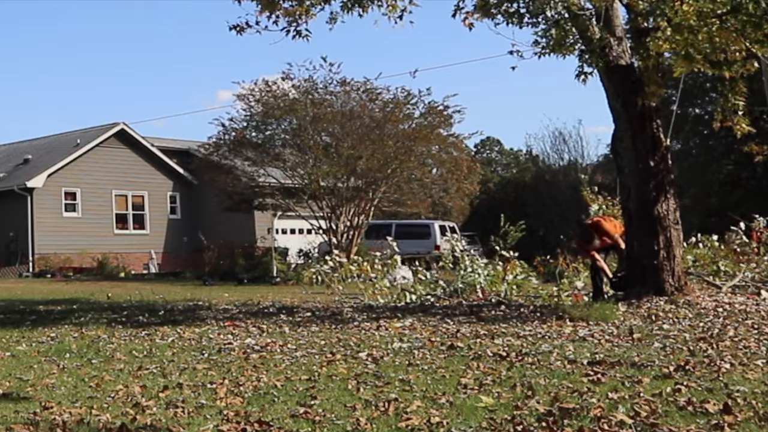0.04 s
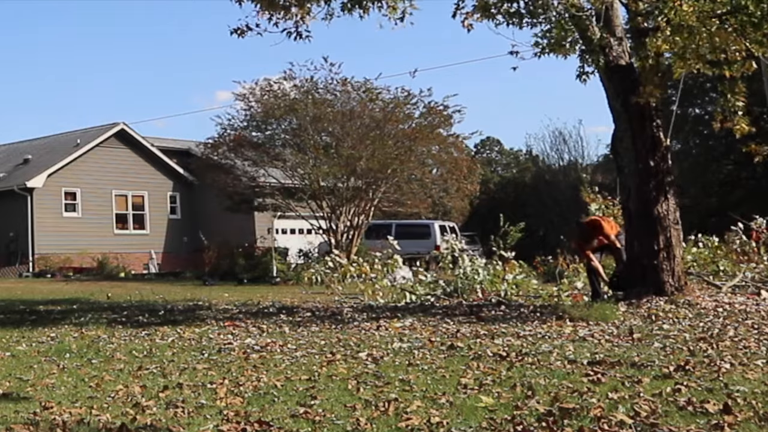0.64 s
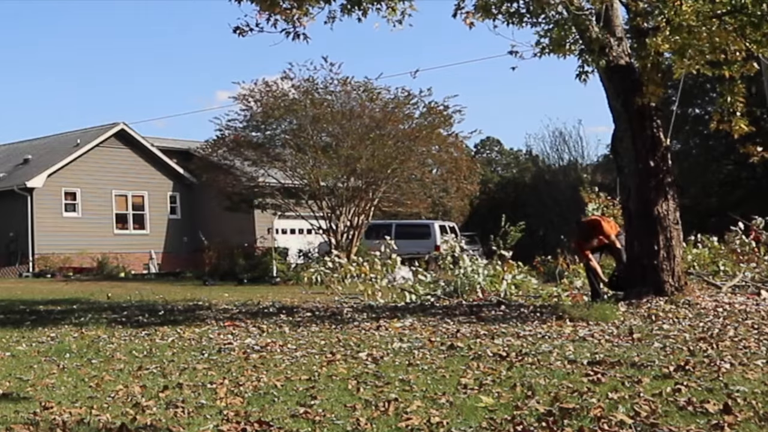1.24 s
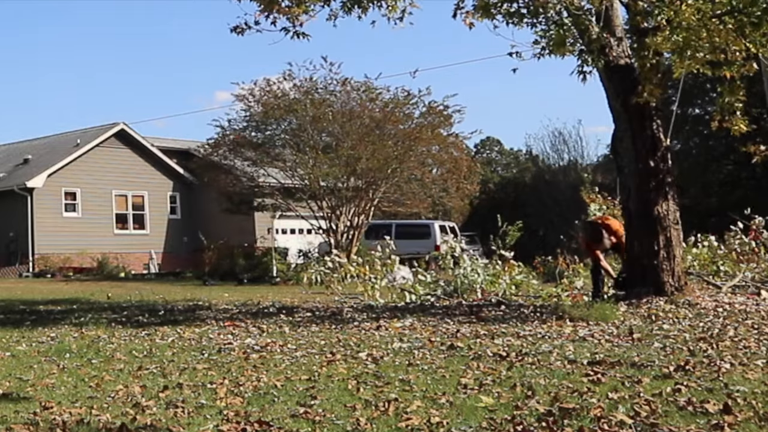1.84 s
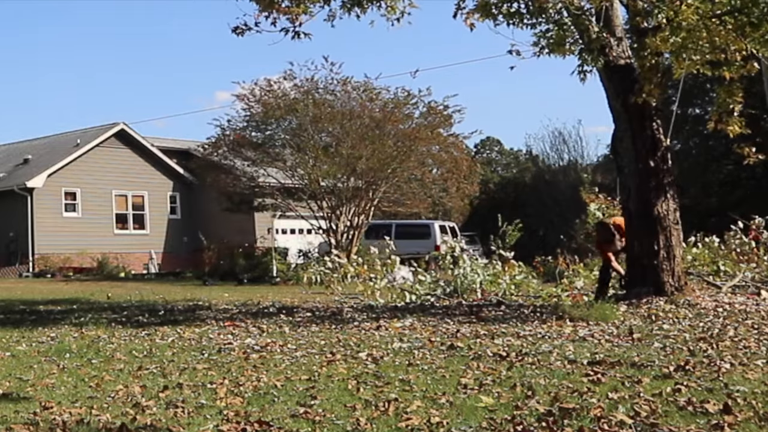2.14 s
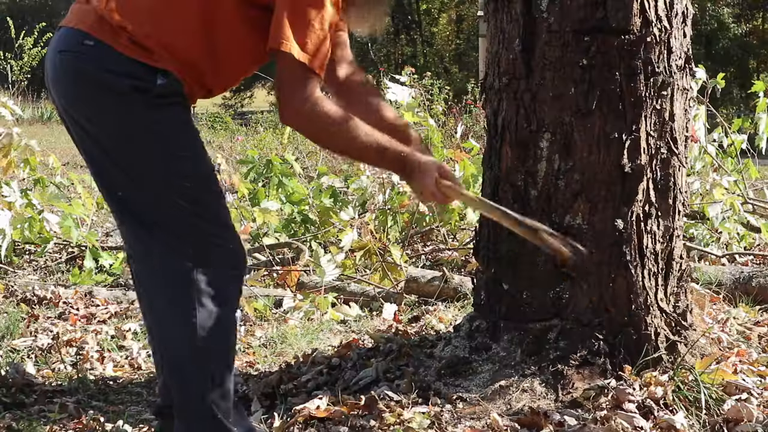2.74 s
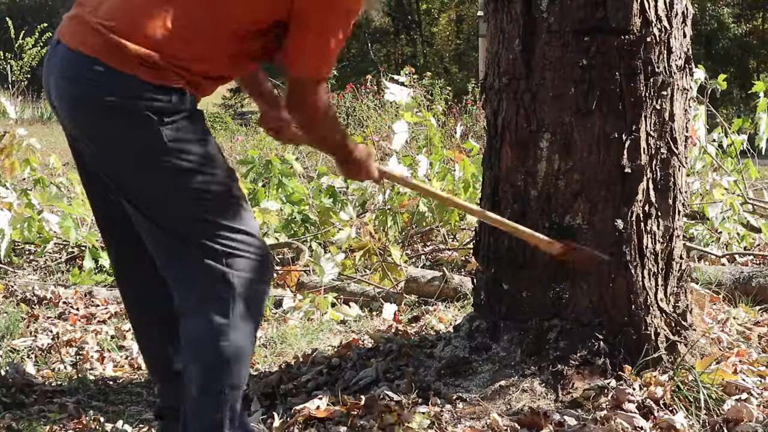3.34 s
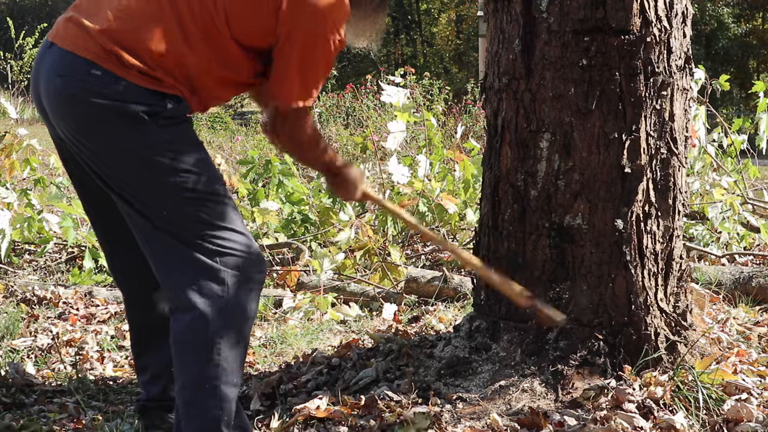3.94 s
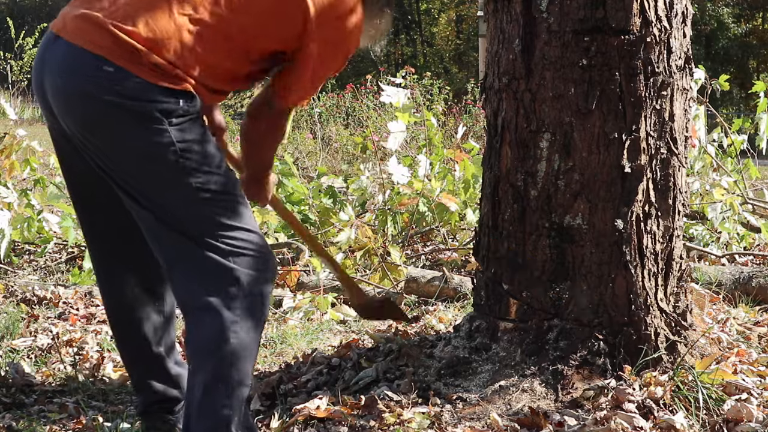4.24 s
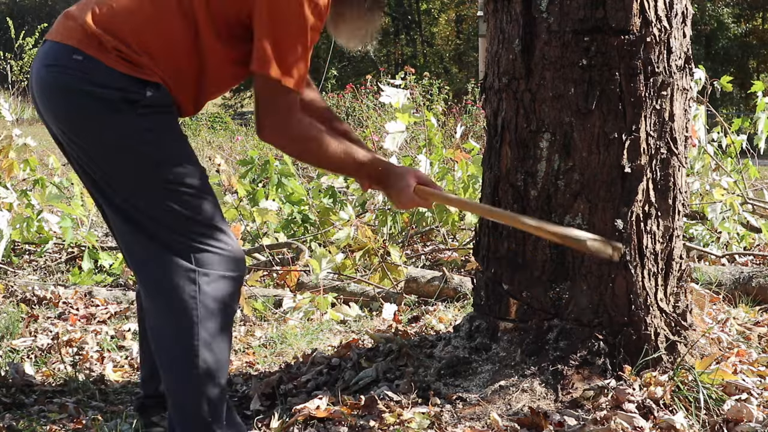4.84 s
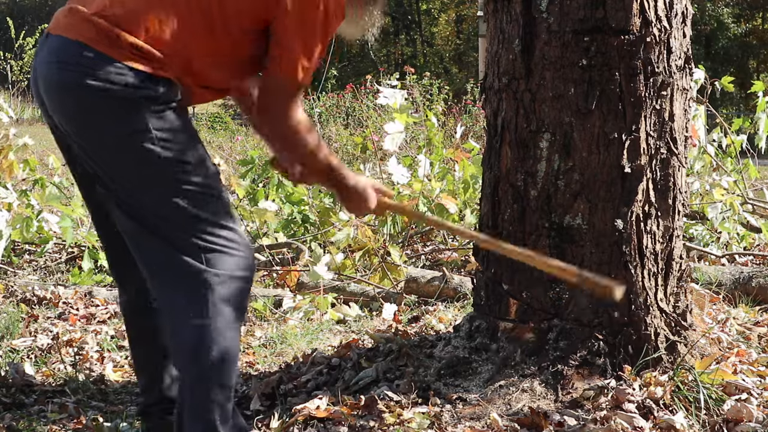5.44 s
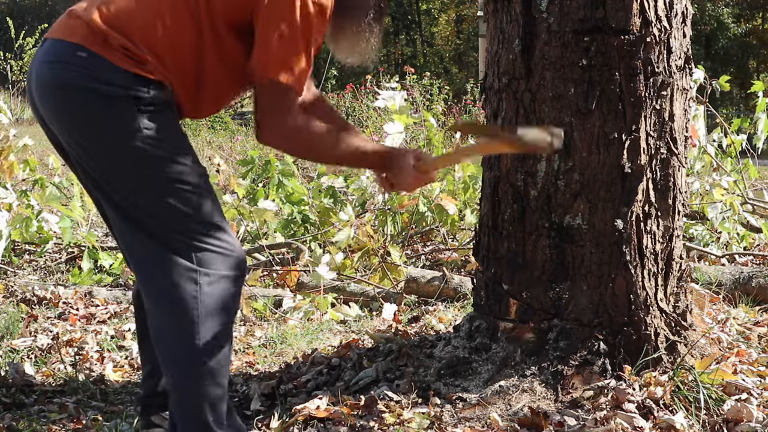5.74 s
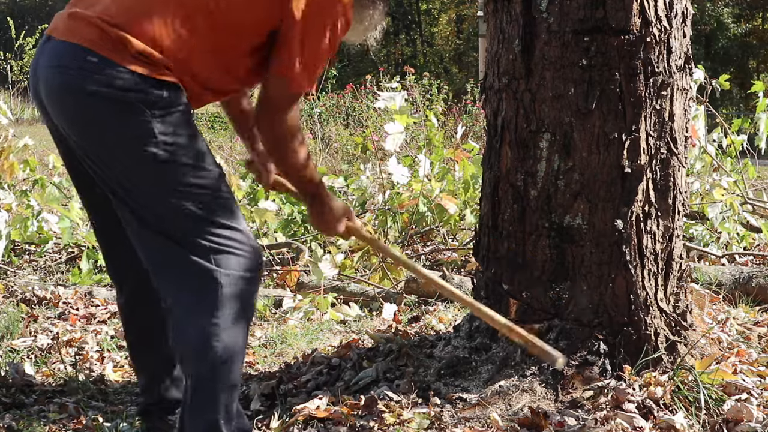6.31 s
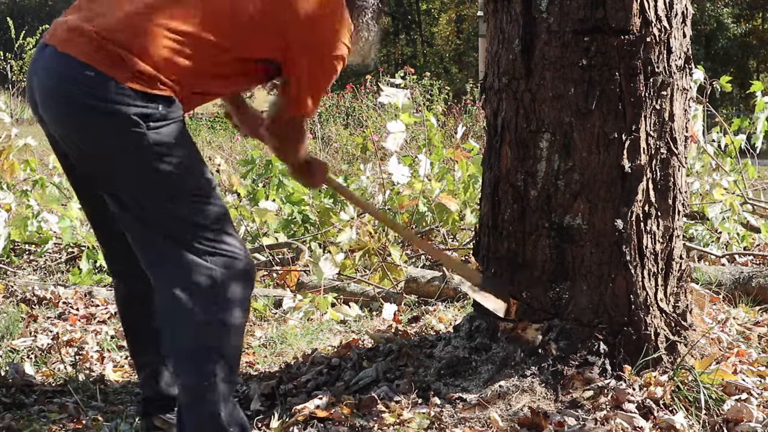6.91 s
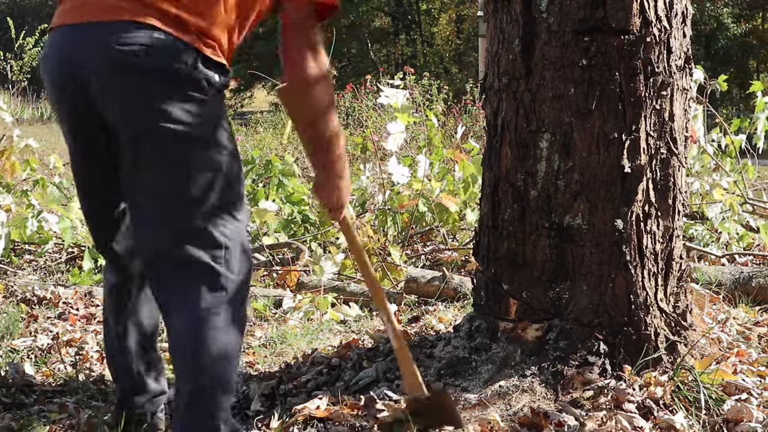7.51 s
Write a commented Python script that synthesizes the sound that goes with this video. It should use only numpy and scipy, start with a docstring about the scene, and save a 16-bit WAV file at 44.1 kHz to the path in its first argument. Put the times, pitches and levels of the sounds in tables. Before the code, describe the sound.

A buzzing chainsaw cuts off abruptly, giving way to close, sharp axe chops on wood with rustling leaves and scraped soil.

```python
"""Chainsaw, then chopping.

A two-stroke chainsaw revs up and down across a yard; with the throttle eased it fires only every third turn.
The scene jumps close to the tree: a blade chops five times into its base, overloading the microphone,
and scrapes through soil and dry leaves between blows. Light wind and far foliage lie underneath."""
import sys
import numpy as np
from scipy import signal
from scipy.fft import rfft, irfft
from scipy.io import wavfile
from scipy.ndimage import map_coordinates

SR = 44100
rng = np.random.default_rng(int(sys.argv[2]) if len(sys.argv) > 2 else 0)


def to_wav(sig):
    """Store sig (one row per channel, or 1-D mono) as 16-bit WAV at the path in sys.argv[1].

    Samples outside -1..1 are clipped; the rate is SR.
    """
    pcm = np.clip(np.atleast_2d(sig), -1, 1) * 32767
    pcm = np.round(pcm).astype(np.int16)
    wavfile.write(sys.argv[1], SR, pcm.T)  # frames by channels


N = 333837
TIME_S = np.arange(N) / SR
SAW_END_S = 2.455

# Engine speed. Each row: time in seconds, crank speed in Hz.
CRANK_SPEED = [(0.0, 153.8), (0.07, 156), (0.28, 179), (0.4, 165.7), (0.51, 162), (0.61, 147.2),
               (0.72, 153.1), (0.79, 145.6), (0.92, 153.2), (1.1, 156.7), (1.41, 148.1), (1.55, 140.3),
               (1.66, 153.6), (1.82, 155.9), (2.03, 164.7), (2.11, 160.7), (2.22, 165.1), (2.43, 155.2)]
# Engine load. Each row: time in seconds, effort in dB.
EFFORT = [(0.03, -32.5), (0.33, -34.5), (0.42, -41), (0.52, -41), (0.91, -35.5), (1.42, -34), (1.48, -38.5),
          (1.7, -35.5), (1.99, -37), (2.28, -33.5)]
# The saw swings towards the listener, then behind the sawyer. Each row: time in seconds, shading in dB.
SHADING = [(0, -3.5), (.8, -4), (1.33, 0.5), (1.55, -4.5), (1.72, -7), (1.9, -11), (2.45, -16)]
# Skipped firings. Each row: start and end in seconds, turns per firing, relative size of skipped turns.
MISFIRES = [(0.31, 0.607, 3, 0.3), (1.447, 1.478, 2, 0.1), (2.072, 2.103, 2, 0.42)]
# Muffler and ground echo weight the two lowest orders. Each row: frequency in Hz, gain in dB.
HUM_RESPONSE = [(141, -13), (147, -3.5), (153, -.5), (164, 2.5), (171.5, -7), (177, -6), (285, -35),
                (294, -39), (304, -6), (313, -6.5), (321, -12.5), (346, -1)]
# Saw voices. Each: base level in dB, dB per dB of effort, dB per dB of shading.
HUM_LAW, BARK_LAW, RASP_LAW = (-42, 0.43, -0.25), (-41, 0.48, -0.11), (-36, 0.77, 0.084)
CHAIN_LAW, FIZZ_LAW = (-36, 0.11, 0.47), (-42.5, 0.14, 1)
# Spectra of the sources. Each row: frequency in Hz, relative density in dB.
BARK_SPECTRUM = [(130, -19.5), (230, 1.5), (330, -1.5), (470, -4.5), (620, 2.5), (790, 0), (950, 1),
                 (1200, -6), (1700, -13), (2400, -17), (4000, -55.5)]
RASP_SPECTRUM = [(500, -39.5), (1000, -4.5), (1700, -10), (2050, -7.5), (2350, 2), (2650, -3.5),
                 (2950, -1.5), (3300, -6), (3700, -26.5), (4500, -16), (6500, -45), (9000, -57)]
CHAIN_SPECTRUM = [(500, -5.5), (1000, -6.5), (3000, 11), (4300, 5), (5150, 6.5), (5420, 10.5), (5800, 6.5),
                  (6800, 4), (8400, -12.5), (11000, -28), (16000, -62)]
FIZZ_SPECTRUM = [(5000, -13), (8000, -5), (10000, 1.5), (11300, 1.5), (13000, -6), (16000, -21)]
RATTLE_SPECTRUM = [(2500, -32), (4500, -13), (5200, 0), (5750, 0), (6500, -16), (8500, -27), (10500, -21),
                   (15000, -35)]
FOLIAGE_SPECTRUM = [(59, -42), (100, 1.5), (177, -6), (210, -6.5), (239, -5.5), (322, -11), (350, -11),
                    (621, -4), (1760, -10), (2630, -2.5), (2860, -3), (3190, -3), (5420, -21),
                    (7770, -17.5), (16000, -65)]
BUFFET_SPECTRUM = [(15, -11), (35, 5), (80, -2), (150, -13), (300, -23), (800, -60)]
LEAF_SPECTRUM = [(500, -11), (1200, -9), (2500, 1), (4000, 3.5), (6000, -2), (8500, -9), (11500, -6),
                 (16000, -31)]
SOIL_SPECTRUM = [(150, -19), (500, -10), (900, -5.5), (1700, -11), (3000, -13.5), (6000, -27.5)]
CHIP_SPECTRUM = [(1000, -11), (3000, -2), (5500, 17), (8500, -28), (11500, 6), (16000, -19)]
SPLINTER_SPECTRUM = [(100, -29), (500, -9.5), (850, 4), (1700, -8.5), (2600, 2.5), (4200, -1), (5500, -6),
                     (8000, -14.5), (11500, -16), (16000, -29)]
EARTH_SPECTRUM = [(40, -21), (110, -4), (260, -1), (450, -12.5), (900, -16), (2000, -50)]
# Yard reverberation. Each row: frequency in Hz, t60 in seconds.
YARD_DECAY = [(100, 0.55), (250, 0.21), (500, 0.11), (1200, 0.089), (2600, 0.15), (6000, 0.094),
              (14000, 0.086)]
# Gusts on the microphone. Each row: peak time and length in seconds, level in dB.
GUSTS = [(2.2, 0.62, -59), (4.5, 0.82, -59.5), (5.15, 1, -61), (5.87, 0.56, -44.5), (6.35, 0.62, -51),
         (7.2, 1.0, -59)]
# Blade strokes through litter. Each row: peak time and length in seconds, leaf and soil levels in dB.
STROKES = [(3.028, 0.16, -51.5, -44), (3.326, 0.13, -51.5, -55), (3.5, 0.22, -53.5, -47.5),
           (3.706, 0.5, -60.5, -52), (4.083, 0.12, -42, -65), (4.242, 0.21, -42, -53),
           (4.334, 0.094, -41.5, -53), (4.453, 0.28, -48, -72), (4.672, 0.26, -52, -55),
           (5.565, .07, -46, -49), (5.843, 0.92, -58.5, -56), (7.104, 0.042, -41, -50),
           (7.44, 0.26, -45.5, -50), (7.565, 0.13, -44, -48.5)]
# Chops. Each row: start in seconds, gain in dB, root pitch in Hz, root gain in dB, root t60 in seconds,
# wood pitch in Hz, wood and splinter gains in dB, bite in seconds, trunk and splinter treble gains in dB.
BLOWS = [(3.1184, -4.5, 430, 0, 0.033, 1060, 5.5, 3.5, 0.0022, -28, 5),
         (4.0375, -3, 219, -7.5, 0.089, 1248, -6.5, 2.5, 0.0066, -39.5, 1),
         (5.0940, 1, 427, -12.5, 0.035, 1156, -5.5, -1, 0.0027, -34.5, 2.5),
         (6.0123, -0.5, 377, 7.5, 0.016, 1003, 1, 6.5, 0.0024, -31.5, -3),
         (6.9044, -4.5, 399, 3, 0.023, 1097, 3.5, -2, 0.0019, -30.5, 2)]
# Split wood. Each row: multiple of its pitch, level in dB, t60 in seconds.
WOOD_MODES = [(.66, -3.5, 0.016), (1, 1.5, 0.017), (1.16, 2, 0.011), (1.36, -4.5, .014), (1.951, 3, 0.0075)]
# Trunk with roots; steel damped by wood. Each row: frequency in Hz, level in dB, t60 in seconds.
TRUNK_MODES = [(91, -30, 0.14), (115, -1.5, 0.16), (233, -21, 0.04), (297, -0.5, 0.13), (396, 8, 0.075),
               (575, 10.5, 0.039)]
BLADE_MODES = [(2336, -8, 0.033), (2480, -48, 0.58), (2710, -10, 0.023), (2960, 2.5, 0.011),
               (3240, -15.5, 0.012), (3900, -21, 0.033), (5300, -30, 0.0089)]
# Blade against root, just after each chop. Each row: start in seconds, gain in dB.
BLADE_JOLTS = [(3.124, -15), (4.0396, -2), (5.095, -0.5), (6.017, -5), (6.9085, -1)]
# Breaking twigs and grit. Each row: start in seconds, peak in dB, pitch in Hz.
TWIG_SNAPS = [(3.4098, -28.5, 2970), (3.4967, -28, 4400), (3.5888, -32.5, 4500), (4.1173, -24, 3950),
              (4.1628, -28, 3400), (4.4265, -24, 4300), (4.6428, -29.5, 3000), (4.662, -31, 3110),
              (4.9244, -41, 2330), (5.4786, -34, 5150), (5.523, -30.5, 4140), (5.97, -30.5, 3600),
              (6.075, -30, 2460), (6.668, -38.5, 2070), (7.084, -32, 2300)]
# Light blade knocks. Each row: start in seconds, crack peak in dB, pitch in Hz, earth thud gain in dB.
BLADE_TAPS = [(4.244, -17, 3200, -61), (4.320, -25.5, 2330, -54), (5.198, -20, 3000, -46),
              (5.811, -25.5, 2200, -46), (6.995, -34.5, 1980, -42), (7.370, -22.5, 2270, -34),
              (7.432, -18, 3060, -55)]


def amp(db):
    return 10 ** (np.asarray(db) / 20)


def unit_rms(x):
    return x / np.sqrt(np.mean(x ** 2) + 1e-20)


def at_hz(points, hz):
    """Interpolate (Hz, value) rows on a log axis."""
    knots_hz, values = np.transpose(points)
    return np.interp(np.log(hz + 1), np.log(knots_hz), values)


def curve(rows):
    """Interpolate (seconds, value) rows per sample."""
    return np.interp(TIME_S, *np.transpose(rows))


def wobble(rate_hz):
    """Smooth random curve."""
    knots = rng.standard_normal(int(N * rate_hz / SR) + 4)
    return map_coordinates(knots, [TIME_S * rate_hz])


def colour(x, spectrum, size=4096):
    """Minimum-phase filter."""
    cepstrum = irfft(np.log(amp(at_hz(spectrum, np.fft.rfftfreq(size, 1 / SR)))))
    cepstrum[1:size // 2] *= 2
    cepstrum[size // 2 + 1:] = 0
    return signal.fftconvolve(x, irfft(np.exp(rfft(cepstrum))))[:len(x)]


def white():
    return rng.standard_normal(N)


def shaped(x, spectrum):
    return unit_rms(colour(x, spectrum))


def noise(spectrum):
    return shaped(white(), spectrum)


def highpass(x, edge_hz):
    return signal.sosfilt(signal.butter(2, edge_hz, "highpass", fs=SR, output="sos"), x)


def attack(t, rise_s):
    return 1 - np.exp(-t / rise_s)


def add(track, start_s, sound):
    part = track[int(start_s * SR):][:len(sound)]
    part += sound[:len(part)]


def pulses(at_samples, sizes, order=8):
    """Band-limited impulses at fractional positions."""
    taps = at_samples.astype(int)[:, None] + np.arange(-order, order + 1)
    offset = taps - at_samples[:, None]
    shape = np.sinc(offset) * np.sinc(offset / (order + 1))
    return np.bincount(np.clip(taps, 0, N - 1).ravel(), (shape * sizes[:, None]).ravel(), N)


def puffs(impulses, decay_s):
    """A decaying noise burst per impulse; rms 1."""
    envelope = signal.lfilter([1], [1, -np.exp(-1 / (decay_s * SR))], impulses)
    return unit_rms(envelope * white())


def swells(rows, rest_db, rise_share=0.51):
    """Gaussian swells over a resting level, summed in power."""
    power = amp(rest_db) ** 2
    for peak_s, length_s, db in rows:
        offset = (TIME_S - peak_s) / length_s
        width = np.where(offset < 0, rise_share, 1 - rise_share)
        power += (amp(db) * np.exp(-2 * (offset / width) ** 2)) ** 2
    return np.sqrt(power)


def firings(turns, jitter_s, scatter_db):
    """One exhaust pulse a turn; after skipped turns the richer charge fires harder."""
    number = np.arange(1, int(turns[-1]))
    at_samples = np.interp(number, turns, np.arange(N))
    sizes = amp(-scatter_db * white()[number])
    for start_s, end_s, every, weak in MISFIRES:
        inside = np.flatnonzero((at_samples > start_s * SR) & (at_samples < end_s * SR))
        sizes[inside] *= unit_rms(np.where(np.arange(len(inside)) % round(every) == 0, 1, weak))
    return pulses(at_samples + jitter_s * SR * white()[number], sizes)


def saw_gain(law):
    """A saw voice grows with effort and changes as the saw turns away."""
    base_db, per_effort, per_shading = law
    effort_db = curve(EFFORT) - np.mean(EFFORT, axis=0)[1]
    return amp(base_db + per_effort * effort_db + per_shading * curve(SHADING))


def trunk_echo(x, gain_db, delay_s, sway):
    """The trunk reflects the moving saw; the delay drifts, so harmonics swell and fade."""
    delay_samples = delay_s * SR * (1 + sway * wobble(4.08))
    echo = np.interp(np.arange(N) - delay_samples, np.arange(N), x)
    return unit_rms(x + amp(gain_db) * echo)


def yard(x):
    """Scatter from trunk, ground and shrubs; each frequency dies at its own rate."""
    hz, t, bins = signal.stft(rng.standard_normal(SR // 2), SR, nperseg=256)
    tail = signal.istft(bins * amp(-60 * t / at_hz(YARD_DECAY, hz)[:, None]), SR, nperseg=256)[1]
    return signal.fftconvolve(x, tail / np.linalg.norm(tail))[:len(x)]


def chainsaw():
    """Exhaust pulses and gas puffs ring the muffler; the chain hisses along."""
    speed_hz = curve(CRANK_SPEED)
    turns = np.cumsum(speed_hz * (1 + 0.0009 * wobble(30))) / SR - 0.3
    fire = unit_rms(firings(turns, jitter_s=0.000012, scatter_db=0.5))
    bark = colour(fire + 0.19 * puffs(fire, decay_s=0.011), BARK_SPECTRUM)
    bark = saw_gain(BARK_LAW) * trunk_echo(bark, gain_db=-10.5, delay_s=0.0022, sway=0.17)
    rasp = saw_gain(RASP_LAW) * shaped(fire + 0.32 * puffs(fire, decay_s=0.002), RASP_SPECTRUM)
    chain = saw_gain(CHAIN_LAW) * shaped(puffs(fire, decay_s=0.0017) + 1.33 * white(), CHAIN_SPECTRUM)
    fizz = saw_gain(FIZZ_LAW) * shaped(puffs(fire, decay_s=0.0028) + 0.28 * white(), FIZZ_SPECTRUM)
    # Long stutter: the hum sags, the chain slackens.
    start_s, end_s = MISFIRES[0][:2]
    slack = curve([(start_s - 0.02, 0), (start_s, 1), (end_s - 0.06, 1), (end_s, 0)])
    orders = sum(amp(at_hz(HUM_RESPONSE, k * speed_hz)) * np.cos(2 * np.pi * k * turns) for k in (1, 2))
    hum = np.sqrt(2) * saw_gain(HUM_LAW) * amp(-4 * slack) * orders
    rattle = chain_rattle(fire, slack * (TIME_S > start_s))
    bright = rasp + chain * amp(-3 * slack) + fizz
    return hum + bark + bright + rattle + amp(-6.5) * yard(bright) + amp(-8) * yard(bark)


def breeze():
    """Far foliage rustles; light wind bumps the microphone."""
    buffet_gain = swells(GUSTS, rest_db=-74) * amp(3 * wobble(11))
    foliage = amp(-55.5 + 0.84 * wobble(5.08)) * noise(FOLIAGE_SPECTRUM)
    return foliage + buffet_gain * noise(BUFFET_SPECTRUM)


def chain_rattle(fire, slack):
    """Hard firings jerk the slack chain against the bar."""
    jerks = unit_rms(np.sqrt(np.abs(fire)) * fire * slack)
    return amp(-55.5) * shaped(jerks + 0.45 * puffs(jerks, decay_s=0.0012), RATTLE_SPECTRUM)


def crackle(rate_hz, spread_db):
    """Tiny random bursts of uneven size; rms 1."""
    hits = rng.random(N) < rate_hz / SR
    sizes = amp(spread_db * np.minimum(rng.exponential(size=N), 2.5))
    return puffs(hits * sizes, decay_s=0.0004)


def litter():
    """The blade drags through leaves and soil; chips patter from the first chop on."""
    leaf_gain = swells([(s, length_s, db) for s, length_s, db, _ in STROKES], rest_db=-64.5)
    soil_gain = swells([(s, length_s, db) for s, length_s, _, db in STROKES], rest_db=-56.5)
    grains = crackle(rate_hz=450, spread_db=5)
    leaves = shaped(grains + 0.5 * yard(grains) + 0.25 * white(), LEAF_SPECTRUM)
    chips = amp(-72) * shaped(crackle(rate_hz=16, spread_db=2.5), CHIP_SPECTRUM)
    rustle = leaf_gain * amp(wobble(58)) * leaves
    scrape = soil_gain * amp(wobble(25)) * noise(SOIL_SPECTRUM)
    return rustle + scrape + chips * (TIME_S > BLOWS[0][0])


def ring(modes, t, scatter_db=1.5):
    """Damped modes of alternating sign; strengths vary per strike."""
    return sum((-1) ** k * amp(db + scatter_db * rng.normal() - 60 * t / t60_s)
               * np.sin(2 * np.pi * hz * t) for k, (hz, db, t60_s) in enumerate(modes))


def thud(t, t60_s):
    """Loose earth under a blow."""
    return amp(-60 * t / t60_s) * attack(t, 0.0012) * noise(EARTH_SPECTRUM)[:len(t)]


def chops():
    """The blade bites: fibres splinter first, then wood, root and trunk swing."""
    out, t = np.zeros(N), np.arange(SR // 2) / SR
    for (start_s, db, root_hz, root_db, root_t60_s, wood_hz, wood_db,
         splinter_db, bite_s, trunk_db, treble_db) in BLOWS:
        root = amp(root_db) * ring([(root_hz, 0, root_t60_s), (root_hz * 1.905, -9, 0.018)], t)
        wood_modes = [(wood_hz * ratio, mode_db, t60_s) for ratio, mode_db, t60_s in WOOD_MODES]
        knock = amp(wood_db + 1.5) * ring(wood_modes, t)
        fibres = colour(noise(SPLINTER_SPECTRUM)[:len(t)], [(5000, 0), (10000, treble_db)])
        splinters = amp(splinter_db - 6.5 - 60 * np.maximum(t - bite_s, 0) / 0.0088) * fibres
        impact = (root + knock) * attack(t, 0.0012) + splinters * attack(t, 0.00028)
        blow = amp(db) * highpass(impact, edge_hz=233)
        trunk = ring(TRUNK_MODES, t, scatter_db=0.5) * attack(t, 0.00068)
        boom = amp(trunk_db) * (trunk + 1.87 * thud(t, t60_s=0.11))
        add(out, start_s, blow + amp(-21.5) * yard(blow) + boom)
    return out


def jolts():
    """The blade jolts against the root; the steel rings."""
    out, t = np.zeros(N), np.arange(SR // 2) / SR
    for start_s, db in BLADE_JOLTS:
        steel = amp(db) * ring(BLADE_MODES, t) * attack(t, 0.0004)
        add(out, start_s, steel + amp(-23) * yard(steel))
    return out


def crack(t, hz, t60_s, tail_db):
    """Dry burst around one pitch, with a faint tail; peak 1."""
    burst = rng.standard_normal(len(t)) * (amp(-60 * t / t60_s) + amp(tail_db - 60 * t / 0.16))
    burst = colour(burst, [(hz / 6, -26), (hz * 0.6, -11), (hz, 0), (hz * 1.6, -9), (hz * 4, -22)])
    return burst / np.abs(burst).max()


def snaps():
    """Twigs and grit break under the blade."""
    out, t = np.zeros(N), np.arange(SR // 8) / SR
    for start_s, db, hz in TWIG_SNAPS:
        add(out, start_s, amp(db) * crack(t, hz, t60_s=0.013, tail_db=-26))
    return out


def taps():
    """The blade knocks lightly on wood and earth."""
    out, t = np.zeros(N), np.arange(SR // 2) / SR
    for start_s, db, hz, earth_db in BLADE_TAPS:
        wood = amp(db) * crack(t, hz, t60_s=0.02, tail_db=-20)
        earth = amp(earth_db) * highpass(thud(t, t60_s=0.07), edge_hz=150)
        add(out, start_s, wood + earth)
    return out


def scene():
    """The saw cuts to the close chopping; the breeze runs throughout."""
    saw_on = np.clip((SAW_END_S - TIME_S) / 0.012, 0, 1)
    mix = saw_on * chainsaw() + (1 - saw_on) * litter()
    return (mix + chops() + jolts() + taps() + snaps() + breeze())[None]


def record(dry):
    """Gain control with slow recovery, overload on the chops, band limit."""
    threshold_db, max_cut_db, recovery_db_per_s = -18, 5, 5
    smooth_samples, ceiling, top_hz = 400, 0.55, 16400
    power = signal.lfilter([1], [1, 1 / smooth_samples - 1], dry ** 2 / smooth_samples)
    cut_db = np.clip(10 * np.log10(power + 1e-12) - threshold_db, 0, max_cut_db)
    ramp_db = recovery_db_per_s * TIME_S
    ducked = dry * amp(ramp_db - np.maximum.accumulate(cut_db + ramp_db, axis=-1))
    clipped = ducked / (1 + np.abs(ducked / ceiling) ** 4) ** (1 / 4)
    passband = np.clip((top_hz - np.fft.rfftfreq(N, 1 / SR)) / 700, 0, 1)
    return irfft(rfft(clipped) * passband, N)


dry = scene()
out = record(dry)
to_wav(out)
```